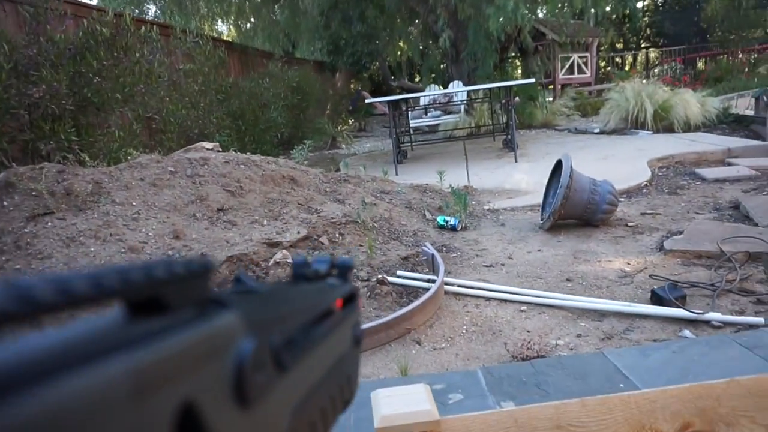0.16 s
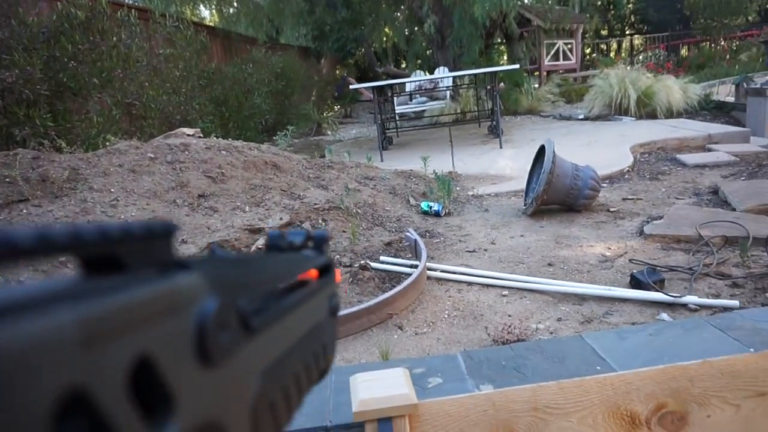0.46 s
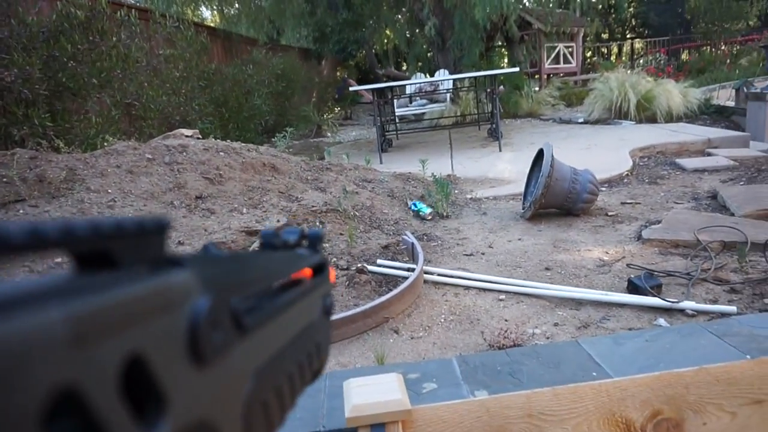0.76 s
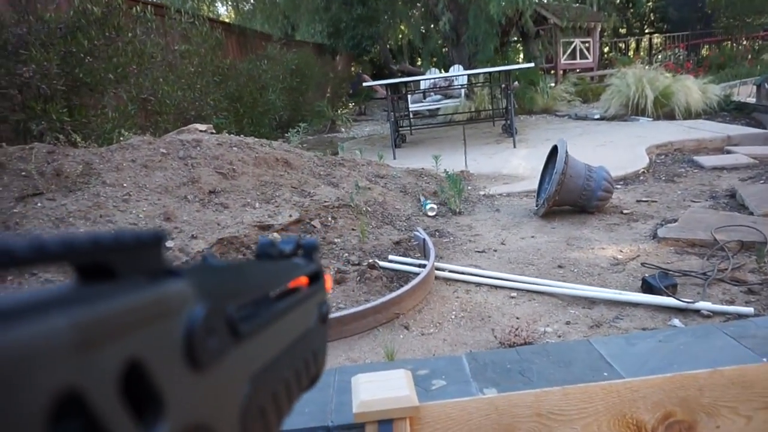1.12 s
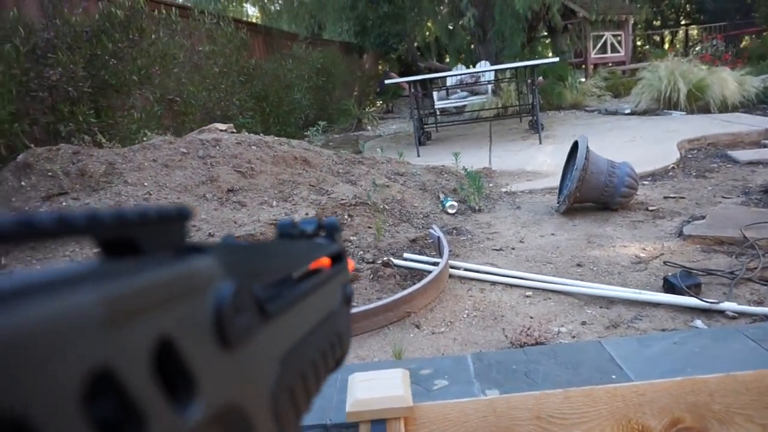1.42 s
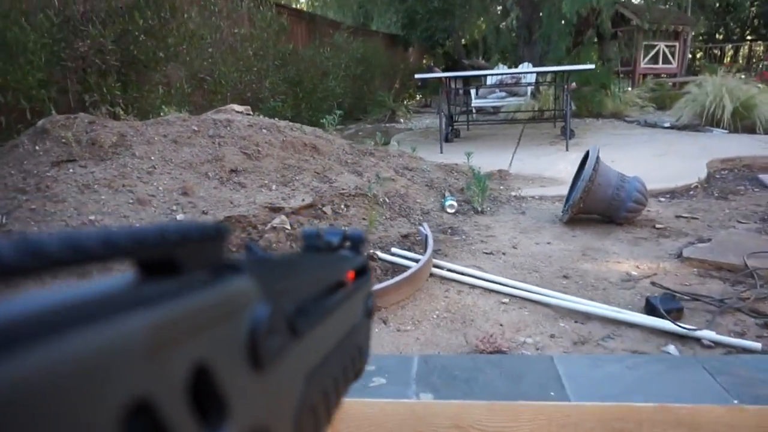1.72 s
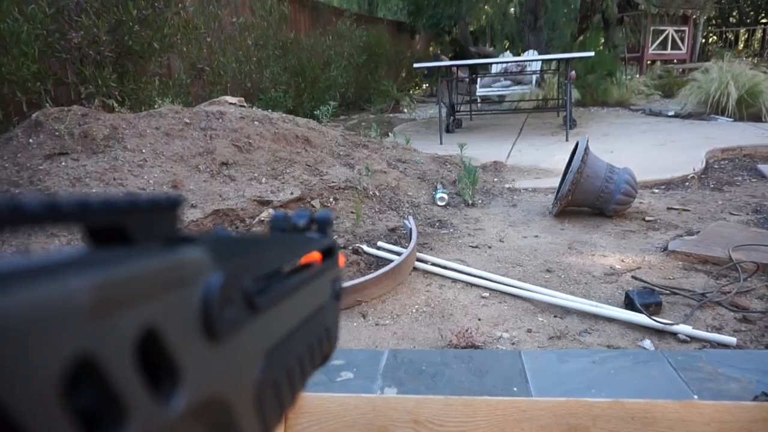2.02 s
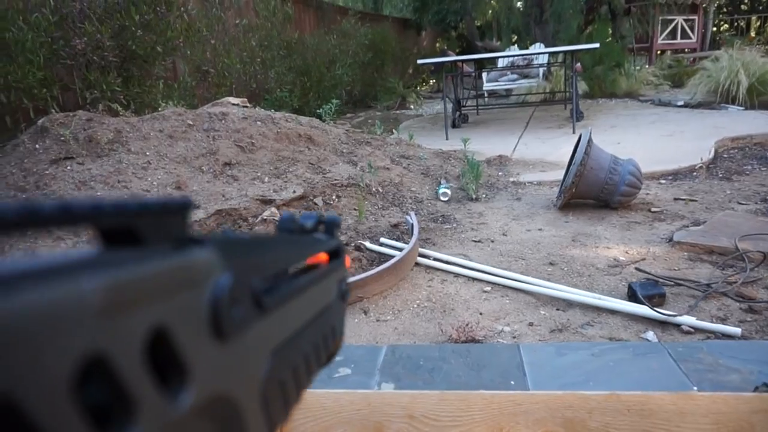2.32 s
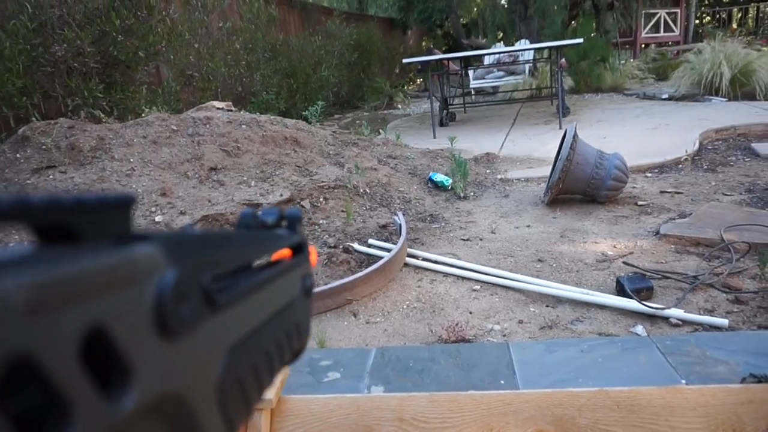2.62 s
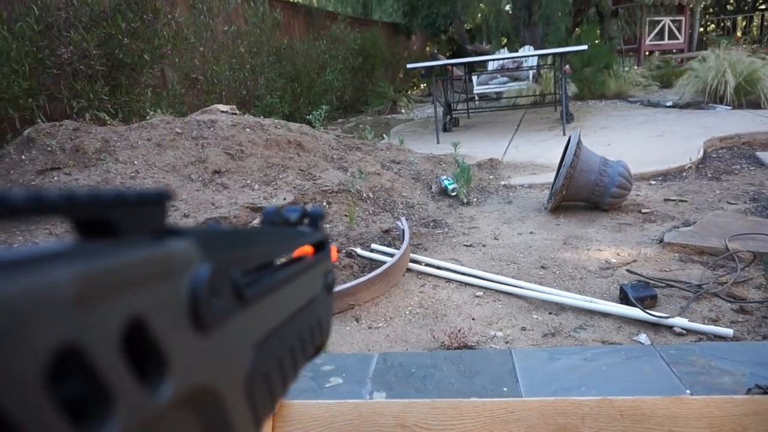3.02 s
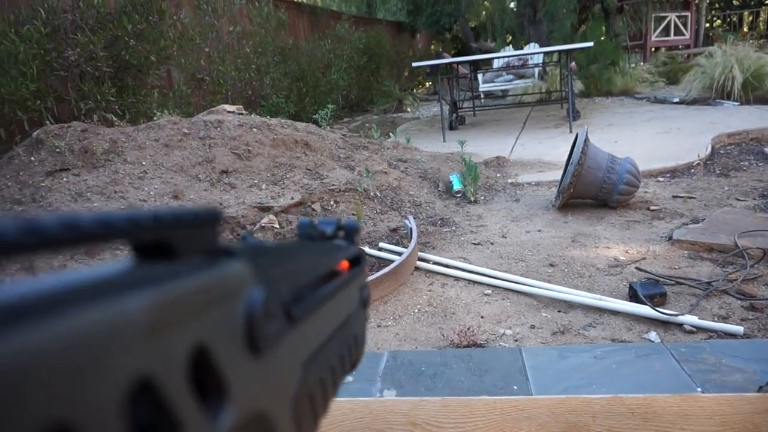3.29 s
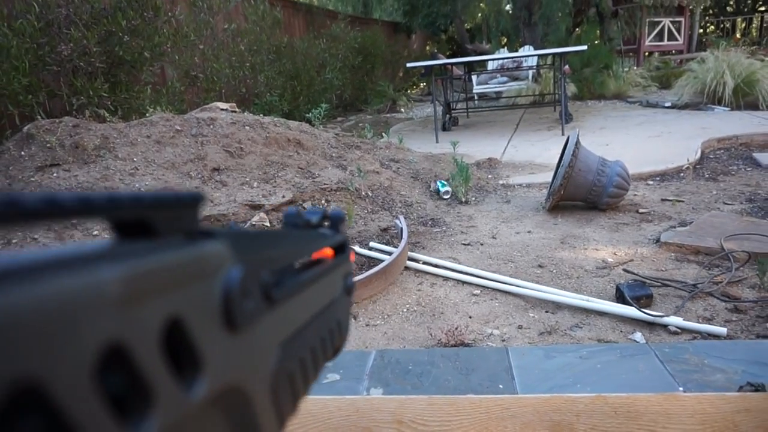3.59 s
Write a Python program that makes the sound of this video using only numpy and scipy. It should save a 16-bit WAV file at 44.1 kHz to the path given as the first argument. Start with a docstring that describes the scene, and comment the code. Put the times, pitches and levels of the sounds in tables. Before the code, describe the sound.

An electric airsoft rifle fires one shot, then two rapid bursts, pellets cracking on a can outdoors.

```python
"""A faint squeak of the grip comes first, over a low hum; then an electric airsoft rifle fires in a backyard.
Close by and to the left of a microphone pair, its motor clunks, whines up and brakes: one shot, two bursts.
Each shot is a low swing, noise bursts for snap, slam and rattle, and ringing shell modes.
Pellets crack on a can that tumbles with ringing modes; one skids off with a high jingle; dull knocks and a rub.
Decaying random taps are the echoes of the yard; shaped noise and a gliding whine are the distance."""
import sys
import numpy as np
from scipy import signal
from scipy.fft import rfft, irfft
from scipy.io import wavfile
from scipy.ndimage import uniform_filter1d

SR = 44100
rng = np.random.default_rng(int(sys.argv[2]) if len(sys.argv) > 2 else 0)


def master_out(mix):
    """Clip the mix to full scale and print it as 16-bit PCM to the path in sys.argv[1]."""
    frames = np.transpose(np.atleast_2d(mix))
    ceiling = np.clip(frames, -1, 1)
    pcm = np.round(ceiling * 32767).astype(np.int16)
    wavfile.write(sys.argv[1], SR, pcm)


N = 165375  # length [samples]


def amp(db):
    """Decibels to gain."""
    return 10 ** (np.asarray(db) / 20)


def unit(x):
    """Scales to rms 1."""
    return x / np.sqrt(np.mean(x ** 2) + 1e-20)


def slow_noise(samples):
    """Noise smoothed by a moving average, rms 1: the source of every flutter and grain."""
    return unit(uniform_filter1d(rng.standard_normal(N), samples))


def read(points, hz):
    """Reads a curve on a log-frequency axis."""
    f, value = np.transpose(points)
    return np.interp(np.log(hz + 1), np.log(f + 1), value)


def add(mix, s, sound):
    """Mixes a sound in at a time in seconds."""
    part = mix[..., max(round(s * SR), 0):][..., :sound.shape[-1]]
    part += sound[..., :part.shape[-1]]


def through(x, response):
    """Convolves each channel with a response."""
    return signal.fftconvolve(np.atleast_2d(x), np.atleast_2d(response), axes=1)[:, :N]


def above(x, hz):
    """Steep high-pass: small bodies radiate no bass."""
    return signal.sosfilt(signal.butter(4, hz, "high", fs=SR, output="sos"), x)


def causal(points, size=4096):
    """Minimum-phase response of a spectrum."""
    log_gain = np.log(amp(read(points, abs(np.fft.fftfreq(size, 1 / SR)))))
    return np.fft.ifft(np.exp(np.conj(signal.hilbert(log_gain)))).real[:size // 2]


def colour(x, points):
    """Filters by a spectrum, with the response scaled to energy 1."""
    response = causal(points)
    return through(x, response / np.linalg.norm(response))


# likeness of the left and right microphones: (frequency [Hz], likeness [0-1])
STEREO_LIKENESS = [(250, 0.96), (600, 0.8), (1400, 0.42), (3000, 0.04), (7000, 0.2), (14000, 0.75)]


def paired(x):
    """Makes two unrelated channels as alike as two close microphones hear them."""
    same = np.clip(read(STEREO_LIKENESS, np.fft.rfftfreq(N, 1 / SR)), 0, 1)
    a, b = rfft(x, N)
    return irfft(np.array([a, same * a + np.sqrt(1 - same ** 2) * b]), N)


def blows(rows, spectrum, sharp, rise_s):
    """Each blow (time [s], level [dB], ring [s]) is a click weighted by sharp and a dying spray of contacts."""
    t, spray, click = np.arange(SR // 10) / SR, np.zeros((2, N)), np.zeros(N)
    for s, db, ring in rows:
        z = rng.standard_normal((2, len(t))) * np.exp(-t / ring) * (1 - np.exp(-t / rise_s))
        add(spray, s, amp(db) * z / np.linalg.norm(z, axis=1, keepdims=True))
        add(click, s, amp([db]) * sharp)
    return colour(paired(spray) + click, spectrum) / np.sqrt(1 + sharp ** 2)


def ringing(modes):
    """Response of modes (frequency [Hz], level [dB], t60 [s]): dying sines, total energy 1."""
    t = np.arange(SR // 4) / SR
    ring = sum(amp(db - 60 * t / t60) * np.sin(2 * np.pi * hz * t) for hz, db, t60 in modes)
    return ring / np.linalg.norm(ring)


# shots of the rifle: (time [s], relative level [dB])
SHOTS = [(0.5521, 2), (2.2607, 4), (2.3469, 1.5), (2.4218, 2), (2.493, 2), (2.9053, 4.5), (2.998, 2.5),
         (3.0727, 0.5), (3.1448, 2), (3.215, 2), (3.2854, 4), (3.357, 1.5)]
# gun shell modes: (frequency [Hz], relative level [dB], t60 [s])
SHELL_MODES = [(255, 5, .1), (278, 5, .09), (312, 2, .07), (408, 1, .08), (540, -3, .06), (724, 0, .12),
               (930, -2, .07), (1150, -1, .05), (1365, 1, .06), (3037, -4, .03)]
# spectra of muzzle snap, piston slam and spring rattle: (frequency [Hz], relative level [dB])
SNAP_SPECTRUM = [(100, 12.5), (500, -29), (1700, -12.5), (2300, 5), (3700, -5), (4600, 0.5), (6500, -16),
                 (8000, -5), (11000, -19.5), (16000, -13.5)]
SLAM_SPECTRUM = [(40, -38), (100, -33), (200, -5), (380, -3), (600, -2.5), (800, -10), (1250, 2),
                 (2100, -9), (3000, -8), (4000, -22.5), (6500, -14.5), (16000, -23.5)]
RATTLE_SPECTRUM = [(100, -24), (210, -40.5), (300, -16.5), (600, -6), (950, -13.5), (1500, 2), (2600, -4),
                   (5000, -14), (10000, -25.5), (16000, -35)]


def shots(slam_s=.0037, rattle_s=0.013):
    """Piston slide, muzzle snap, piston slam with the shell ringing, then the spring rattles."""
    def stage(delay, db, ring):
        return [(s + delay, level + db, ring) for s, level in SHOTS]
    slide = blows(stage(-.003, -1, .004), SNAP_SPECTRUM, 0, .002)
    snap = blows(stage(-0.00033, 9.8, 0.00086), SNAP_SPECTRUM, 0.51, .0001)
    slam = blows(stage(slam_s, 12.9, 0.0032), SLAM_SPECTRUM, 0.64, 0.00027)
    # the rattle varies a little in time and level from shot to shot
    rattles = [(s + rattle_s + rng.normal(0, 0.002), level + 2.0 + rng.normal(0, 0.4), .005)
               for s, level in SHOTS]
    rattle = blows(rattles, RATTLE_SPECTRUM, 0, 0.0019)
    strikes = np.zeros(N)
    for s, level in SHOTS:
        add(strikes, s + slam_s, amp([level + 8.0]))
    return slide + snap + slam + rattle + through(strikes, ringing(SHELL_MODES))


def recoil(lead_s=0.01295, skew=0.79):
    """The spring throws the piston forward and the gun swings under a short arch: a low thump."""
    length_s, hz, db, cut_hz = .024, 96, -27.5, 60
    t, out = np.arange(0, length_s, 1 / SR), np.zeros(N)
    swing = -np.sin(2 * np.pi * hz * t) * np.sin(np.pi * (t / length_s) ** skew)
    for s, level in SHOTS:
        add(out, s - lead_s, amp(db + level) * swing)
    return signal.sosfilt(signal.butter(2, cut_hz, "high", fs=SR, output="sos"), out)


# trigger pulls: (start [s], first shot [s], motor off [s], whine level [dB], gear level [dB],
# pitch the whine climbs towards [Hz])
PULLS = [(0.46, 0.545, 0.55, -18.5, -25, 1452), (2.17, 2.259, 2.42, -15, -17, 1335),
         (2.862, 2.905, 3.41, -14.5, -16.5, 1375)]
# spectrum of the gear noise: (frequency [Hz], relative level [dB])
GEAR_SPECTRUM = [(60, -45.5), (200, -29), (320, -16), (560, -2.5), (740, 2), (1000, 2.5), (1400, -2.5),
                 (1900, -6.5), (3000, -10.5), (6000, -22.5), (16000, -37.5)]
SPIN_FROM, SPIN_S = 0.45, .028  # starting fraction of the top pitch, time constant of the climb [s]
WHINE_FULL_S, WHINE_ROUGH = 0.06, 0.053  # build-up [s], rms pitch jitter as a fraction
RUN_DB, COAST_S = -20, 0.016  # gear level between shots, dying time constant after motor off [s]
DRAW_S, SLACK_DB = 0.068, -4  # after each shot the gears run light until the spring is drawn again


def motor():
    """Gear teeth whine upward while the spring is first drawn, then strain against it before every shot."""
    t, whine, drive = np.arange(N) / SR, np.zeros(N), np.zeros(N)
    fired = np.array([0] + [s for s, db in SHOTS])
    since_shot = t - fired[np.searchsorted(fired, t, "right") - 1]
    spring = np.minimum(since_shot / DRAW_S, 1)
    for start, first, off, whine_db, gear_db, top_hz in PULLS:
        age = np.maximum(t - start, 0)
        hz = top_hz * (1 - (1 - SPIN_FROM) * np.exp(-age / SPIN_S))
        turns = np.cumsum(hz * (1 + WHINE_ROUGH * slow_noise(40))) / SR
        # the load builds up and lets go at the first shot
        load = np.minimum(age / WHINE_FULL_S, 1) * np.clip((first - t) / 0.0014, 0, 1)
        flutter = 1 + .5 * slow_noise(150)
        tone = np.sin(2 * np.pi * turns) + amp(-19.0) * np.sin(4 * np.pi * turns)
        whine += amp(whine_db) * load ** 2 * flutter * tone
        running = (t > first) * np.exp(-np.maximum(t - off, 0) / COAST_S)
        drive += amp(gear_db) * load ** 0.97 + amp(RUN_DB + SLACK_DB * (1 - spring)) * running
    teeth = unit(amp(3.5 * slow_noise(50)))
    return whine + colour(paired(rng.standard_normal((2, N))) * teeth * drive, GEAR_SPECTRUM)


# clunks of the motor starting or braking: (time [s], relative level [dB], ring [s])
CLUNKS = [(.4675, -6.5, 0.0045), (.668, 2, 0.0042), (.688, -7.5, 0.0094), (2.177, -3.5, 0.0085),
          (2.598, -1, 0.01), (2.62, -8.5, .011), (2.831, -19, 0.0086), (2.852, 3, 0.0026),
          (2.895, -1.5, 0.0083), (3.382, -5.5, 0.0017), (3.468, 6.5, 0.0059), (3.491, -2.5, 0.0057)]
# spectrum of a clunk: (frequency [Hz], relative level [dB])
CLUNK_SPECTRUM = [(60, -48), (200, -30), (330, 1.5), (500, 1.5), (700, 7), (1000, 6.5), (1400, 9.5),
                  (1900, -1.5), (3200, -8.5), (6000, -17), (16000, -28)]
# how the gun is weakened at the right microphone: (frequency [Hz], level [dB])
RIGHT_SHADE = [(200, -1), (400, -2), (700, -6), (1300, -16.5), (2400, -10), (4400, -3), (15000, -8)]


def rifle(right_lead_s=0.00019):
    """All the gun's sounds, close and to the left: weaker on the right, where they are shifted earlier."""
    clunks = blows(CLUNKS, CLUNK_SPECTRUM, 0.45, 0.0016)
    clunk_ring = through(clunks, ringing(SHELL_MODES))
    left, right = above(shots() + motor() + amp(10.0) * clunks + amp(-2.5) * clunk_ring, 269)
    shaded = through(right, causal(RIGHT_SHADE))[0]
    # the low thump reaches both microphones alike
    return np.array([left, np.roll(shaded, -round(right_lead_s * SR))]) + recoil()


# pellets hitting and bouncing: (time [s], relative level [dB], ring [s])
PELLETS = [(.5832, 4.5, 0.0037), (2.4505, 2.5, 0.0027), (2.5222, 10, 0.00093), (2.6525, -4, 0.011),
           (2.795, -11, 0.005), (2.935, -0.5, 0.0063), (3.029, 6, .004), (3.106, 3, 0.0057),
           (3.317, 9, 0.0068), (3.3875, 4.5, 0.0038), (3.5545, -5.5, 0.0035)]
# the can tumbling: (time [s], relative level [dB], brightness [dB per octave])
TUMBLES = [(.908, -7, 5), (0.951, -5.5, -1), (0.983, -8, -1.5), (1.012, -12, 1.5), (1.029, 1.5, 1.5),
           (1.06, -9, 2), (1.153, -5.5, -3.5), (1.182, -16, -4), (1.255, -17.5, 6.5), (2.7034, 15, 5.5)]
# can modes: (centre frequency [Hz], relative level [dB], t60 [s])
CAN_MODES = [(931, 0, 0.096), (1451, 0, 0.13), (2400, -0.5, 0.076), (2716, -4, 0.045), (3240, -8.5, 0.063),
             (3920, -4, 0.066), (5800, -11, 0.044), (6900, -17, 0.05)]
# spectrum of a pellet crack: (frequency [Hz], relative level [dB])
CRACK_SPECTRUM = [(100, -32.5), (350, -31.5), (750, -8), (1400, -3.5), (2000, -5.5), (4000, -2), (7000, -1),
                  (11000, -6.5), (16000, -10)]


def can(ring_db=-5, tick_db=-25, spread=0.0407):
    """Pellets crack on the can and the ground; each clink of the can has its own brightness."""
    hits = blows(PELLETS, CRACK_SPECTRUM, 0.47, 0.00036)
    ticks = blows([(s, db + tilt, .003) for s, db, tilt in TUMBLES], CRACK_SPECTRUM, 0.87, 0.0014)
    clinks, t = np.zeros((2, N)), np.arange(SR // 20) / SR
    for s, db, tilt in TUMBLES:
        # five scattered copies of every mode, drawn anew at each landing
        modes = [(hz * rng.normal(1, spread), level + tilt * np.log2(hz) + rng.normal(0, 2), t60)
                 for hz, level, t60 in CAN_MODES for k in range(5)]
        contact = rng.standard_normal((2, len(t))) * np.exp(-t / 0.007)
        clink = unit(through(contact, ringing(modes))) / np.sqrt(SR)
        add(clinks, s, amp(db + ring_db) * clink)
    hit_ring = through(amp(-14) * hits, ringing(CAN_MODES))
    return amp(-1.5) * hits + amp(tick_db) * ticks + above(paired(clinks), 740) + hit_ring


# ring of a ricochet: (centre frequency [Hz], level [dB], longest t60 [s])
RICOCHET_MODES = [(9450, 1, .24), (10400, -4, .22), (11200, -7, .2), (12200, -5, .18), (12900, -7, .13)]


def ricochet(db=0, scrape_s=0.023):
    """One pellet skids off metal with a thin high jingle of close modes."""
    out, t = np.zeros((2, N)), np.arange(SR // 10) / SR
    for hz, level, t60 in RICOCHET_MODES:
        scrape = rng.standard_normal((2, len(t))) * np.exp(-t / scrape_s)
        cluster = [(hz * rng.normal(1, .025), 0, t60 * rng.uniform(.4, 1)) for k in range(20)]
        ring = through(scrape, ringing(cluster))
        add(out, 2.652, amp(db + level) * ring / np.linalg.norm(ring))
    return out


# soft dull knocks, two low bumps, then the can rocking: (time [s], level [dB], lowest mode [Hz])
KNOCKS = [(1.549, -21.5, 350), (1.691, -21.5, 301), (3.6495, -8.5, 799)]
# modes of a soft knock: (multiple of the lowest, relative level [dB], t60 [s])
KNOCK_MODES = [(1, 3, 0.043), (1.88, -7, 0.072), (3.1, -11, 0.046)]


def knocks(touch_s=0.0051, thud_db=-2):
    """Dull bumps: a padded thud and a hollow ring."""
    out, t = np.zeros(N), np.arange(SR // 8) / SR
    for s, db, hz in KNOCKS:
        push = rng.standard_normal(len(t)) * np.exp(-t / touch_s)
        modes = [(hz * ratio, level, t60) for ratio, level, t60 in KNOCK_MODES]
        ring = through(push, ringing(modes))[0, :len(t)]
        thud = signal.sosfilt(signal.butter(3, [hz * .8, 1300], "band", fs=SR, output="sos"), push)
        knock = ring / np.linalg.norm(ring) + amp(thud_db) * thud / np.linalg.norm(thud)
        add(out, s, amp(db) * knock)
    return out


# small squeaks of the grip: (time [s], relative level [dB], pitch [Hz])
SQUEAKS = [(0.058, -51, 1550), (0.074, -40.5, 1490), (0.09, -41.5, 1480), (0.114, -47.5, 1570)]
# spectrum of the rub: (frequency [Hz], relative level [dB])
RUB_SPECTRUM = [(100, -10), (350, -8), (700, 2), (1400, 1.5), (2200, -2), (3500, -15.5), (7000, -21.5),
                (15000, -39)]


def handling(start_s=1.8556, end_s=2.115, rise_s=0.085, fall_s=0.067, squeak_s=0.0033):
    """The stock rubs along a sleeve as the aim shifts (grainy noise); the grip squeaks (harmonic tone)."""
    t, squeaks = np.arange(N) / SR, np.zeros(N)
    stroke = np.clip(np.minimum((t - start_s) / rise_s, (end_s - t) / fall_s), 0, 1)
    grain = amp(2 * slow_noise(200))
    rub = amp(-40.0) * colour(paired(rng.standard_normal((2, N))) * stroke * grain, RUB_SPECTRUM)
    squeak_hz = np.interp(t, *np.transpose(SQUEAKS)[::2])
    turns = np.cumsum(squeak_hz * (1 + 0.044 * slow_noise(40))) / SR
    for s, db, hz in SQUEAKS:
        squeaks += amp(db) * np.exp(-((t - s) / squeak_s) ** 2)
    tone = sum(np.sin(2 * np.pi * k * turns) / k ** 1.65 for k in range(1, 6))
    return (rub + amp(3) * squeaks * tone) * amp([[0], [-3]])  # 3 dB weaker on the right


# yard decay, held to 0.2-1.2 s when played: (frequency [Hz], t60 [s])
YARD_DECAY = [(200, 0.12), (800, 0.94), (3000, 0.61), (8000, 0.51), (16000, 0.56)]
# echo strength: (frequency [Hz], level [dB])
YARD_SPECTRUM = [(100, -39), (300, -20.5), (800, -25.5), (1400, -25.5), (3000, -13.5), (8000, -10),
                 (16000, -10)]


def yard(x, build_s=.012):
    """Scattered echoes from fences, house and ground, each band dying at its own speed."""
    sparse = rng.standard_normal((2, N)) * (rng.random((2, N)) < 4000 / SR)  # about 4000 echoes a second
    taps = paired(sparse)[:, :SR]
    hz, t, z = signal.stft(taps, SR, nperseg=256)
    t60 = np.clip(read(YARD_DECAY, hz), .2, 1.2)
    fade = amp(-60 * t / t60[:, None]) * (1 - np.exp(-t / build_s))
    tail = signal.istft(z * fade, SR, nperseg=256)[1]
    return through(through(x, tail / np.linalg.norm(tail[0])), causal(YARD_SPECTRUM))


# spectrum of the background hum: (frequency [Hz], relative level [dB])
HUM_SPECTRUM = [(25, -2), (60, -3), (110, 4.5), (200, -2), (380, -7.5), (700, -11), (1300, -10.5),
                (2000, -22), (3500, -25), (6000, -32), (12000, -36.5), (16000, -53)]
# a faint far whine with a gliding pitch: (time [s], level [dB], pitch [Hz])
FAR_WHINE = [(0, -67, 1450), (0.249, -65, 1398), (.42, -71, 1505), (1.22, -59, 1350), (1.3, -53, 1432),
             (1.38, -51, 1530), (1.5, -72, 1600), (1.67, -69, 1898), (1.749, -68, 1500), (3.75, -72, 1300)]


def outdoors(width_hz=210):
    """Low hum of the neighbourhood as swelling noise, and a faint far whine as a gliding noise band."""
    swell = amp(1.1 * slow_noise(5000))
    hum = amp(-58.0) * colour(paired(rng.standard_normal((2, N))), HUM_SPECTRUM) * swell
    times, *columns = np.transpose(FAR_WHINE)
    db, hz = (np.interp(np.arange(N) / SR, times, column) for column in columns)
    noise = rng.standard_normal((2, N)) + 1j * rng.standard_normal((2, N))
    fuzz = signal.sosfilt(signal.butter(2, width_hz / 2, fs=SR, output="sos"), noise)
    glide = np.exp(2j * np.pi * np.cumsum(hz) / SR)
    return hum + amp(db) * unit(paired((fuzz * glide).real))


def scene():
    """Gun, can and knocks in the yard; two echo fields trade places steadily, so the echoes flutter evenly."""
    direct = rifle() + can() + handling() + knocks() + ricochet()
    turn = 2 * np.pi * 2.3 * np.arange(N) / SR  # 2.3 turns a second
    return direct + yard(direct[0] * np.cos(turn)) + yard(direct[0] * np.sin(turn)) + outdoors()


KNEE_DB, SQUEEZE = -19.5, 0.74  # ducking threshold, dB of ducking per dB above it
HELD_FALL_DB_PER_S = 10  # how fast the held peak level sinks
EDGE_HZ = 15950  # upper band limit


def record(dry, ceiling=0.9):
    """Gain control ducks at loud peaks and recovers slowly; peaks are rounded; then the band limit."""
    power_db = 10 * np.log10(abs(uniform_filter1d((dry ** 2).mean(0), size=220)) + 1e-12)
    fall = np.arange(N) * HELD_FALL_DB_PER_S / SR
    held_db = np.maximum.accumulate(power_db + fall) - fall
    over_db = np.maximum(held_db - KNEE_DB, 0)
    ducked = dry / amp(SQUEEZE * uniform_filter1d(over_db, size=100))
    out = ceiling * np.tanh(ducked / ceiling)
    band_limit = signal.firwin(401, EDGE_HZ, window=("kaiser", 10), fs=SR)
    return signal.oaconvolve(out, band_limit[None], "same")


dry = scene()
out = record(dry)
master_out(out)
```